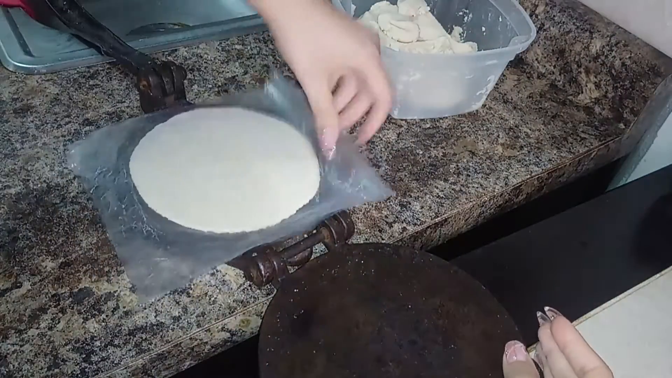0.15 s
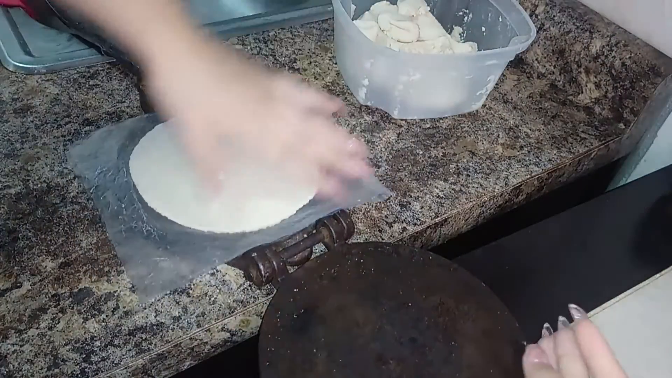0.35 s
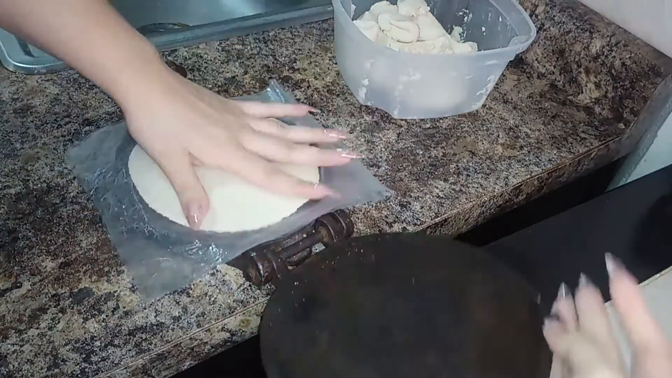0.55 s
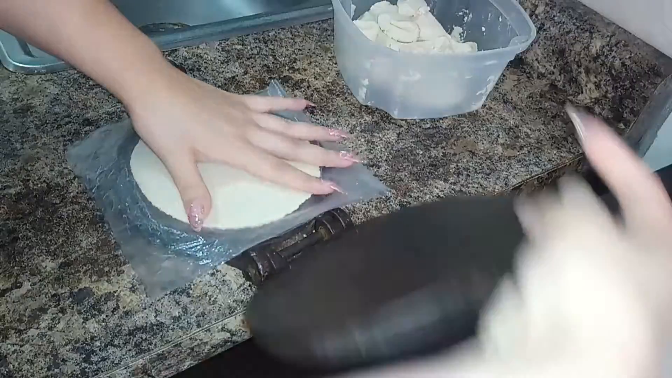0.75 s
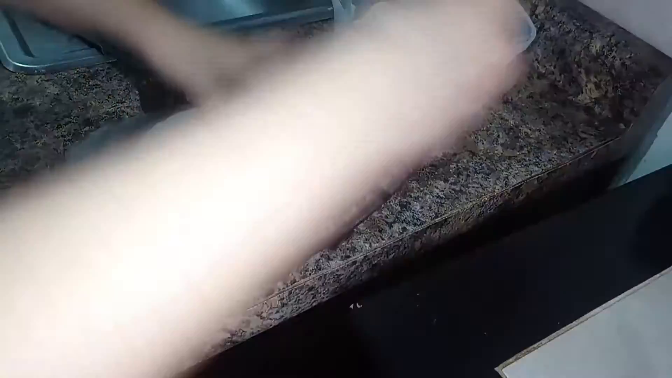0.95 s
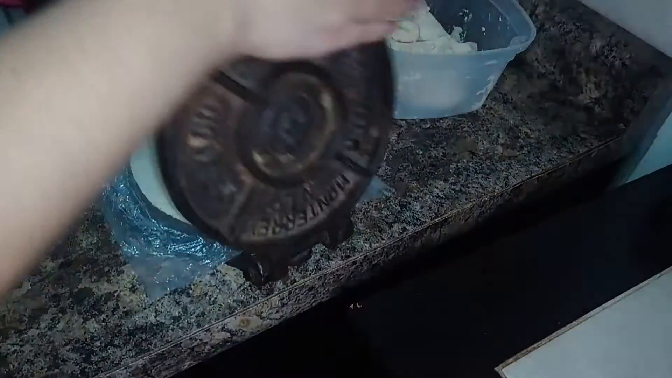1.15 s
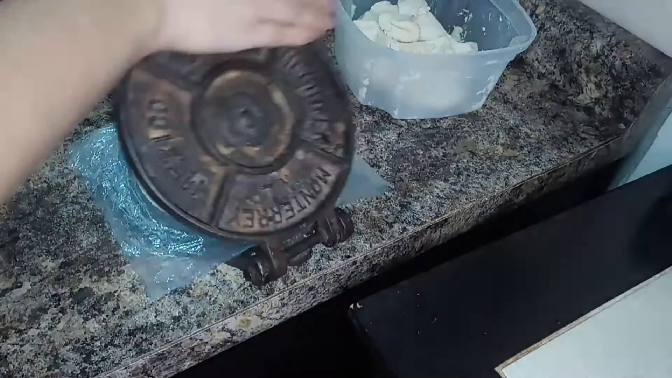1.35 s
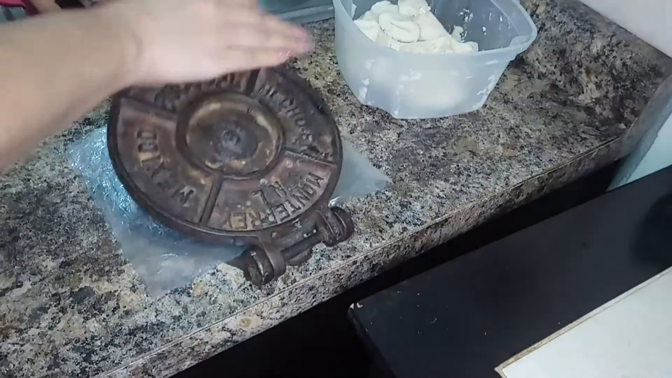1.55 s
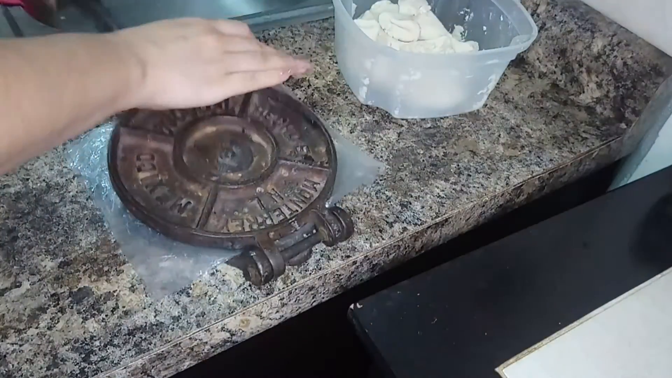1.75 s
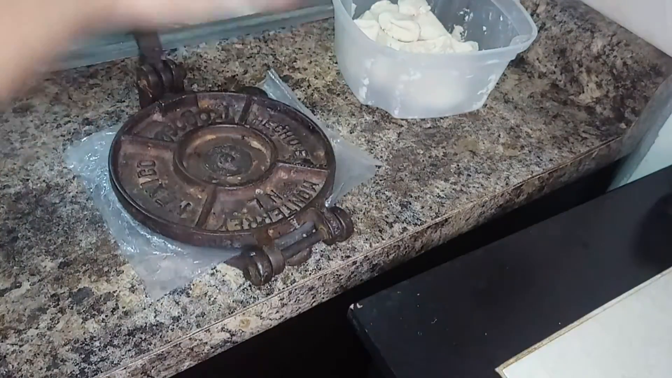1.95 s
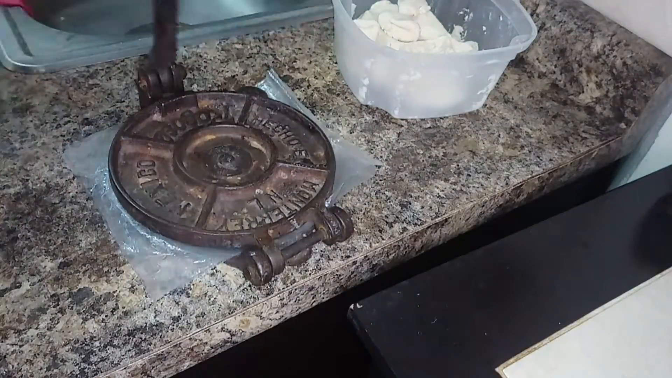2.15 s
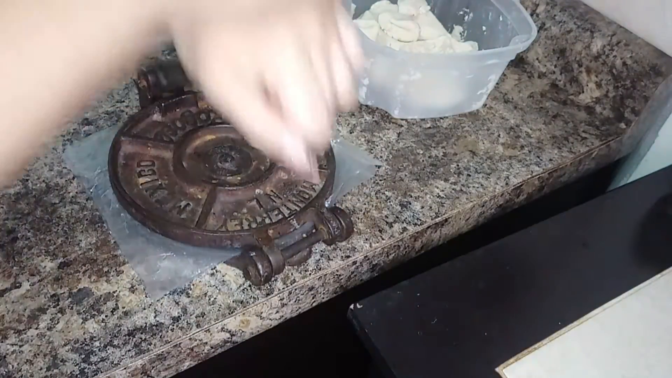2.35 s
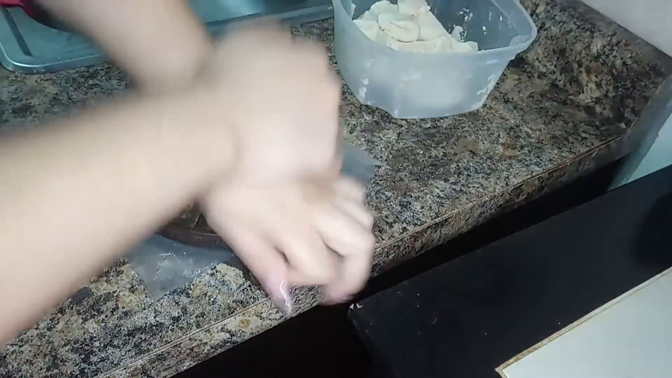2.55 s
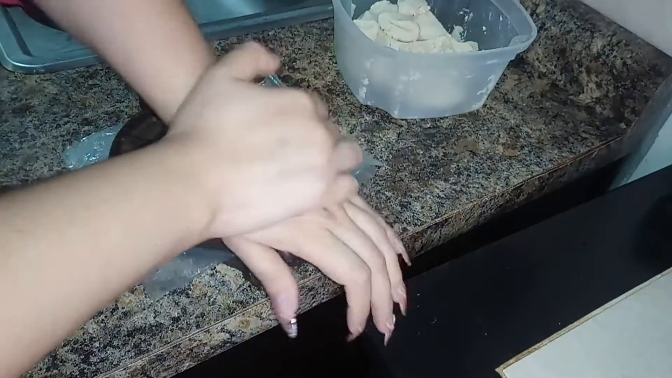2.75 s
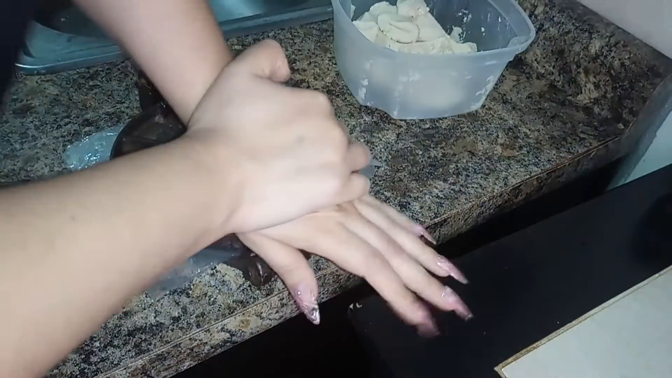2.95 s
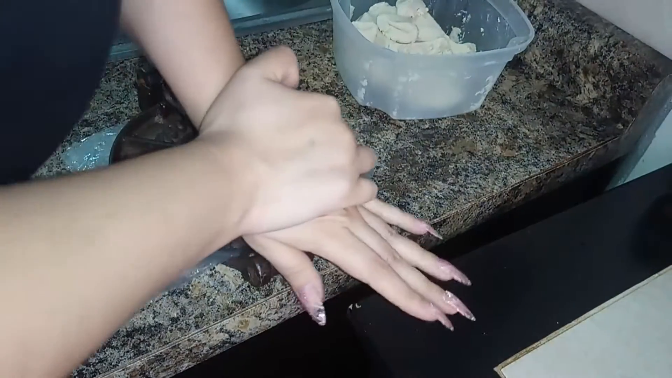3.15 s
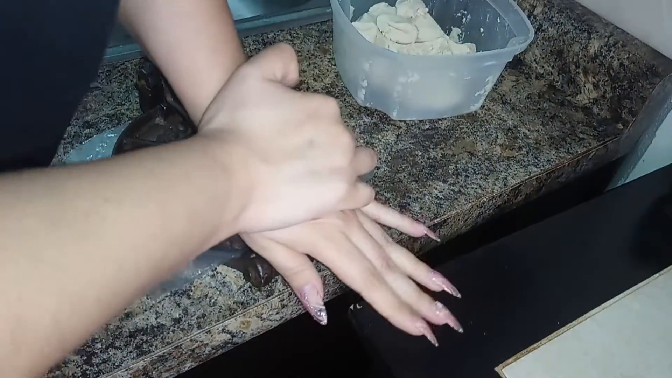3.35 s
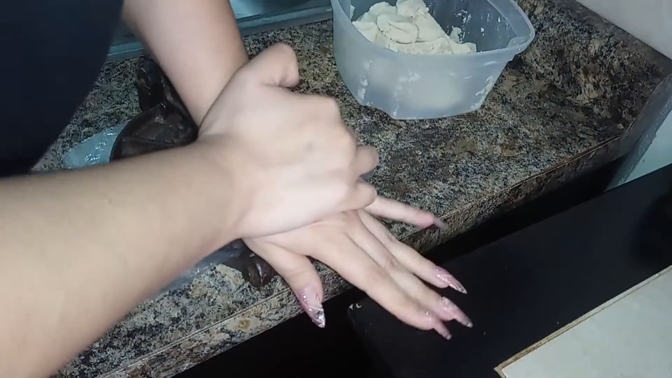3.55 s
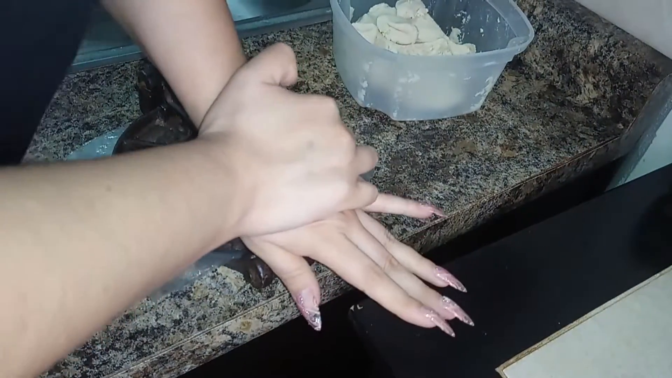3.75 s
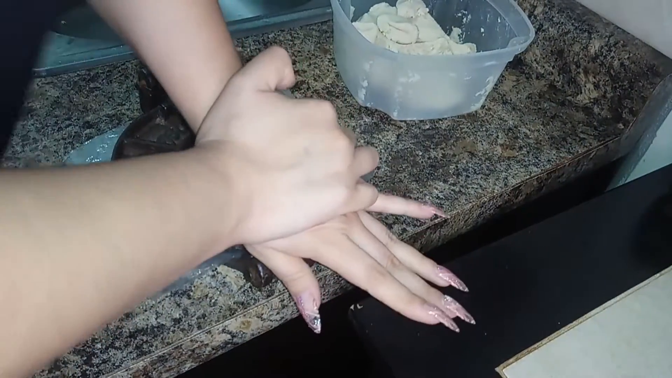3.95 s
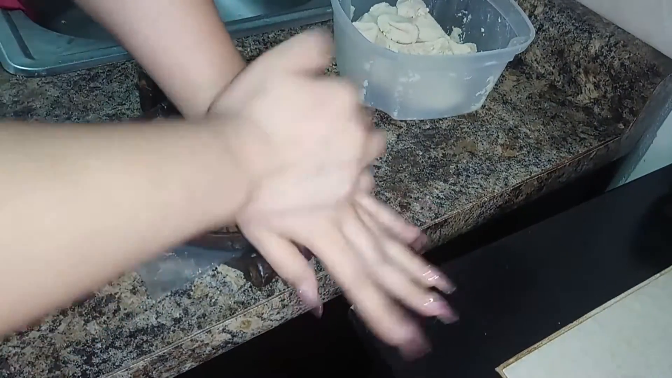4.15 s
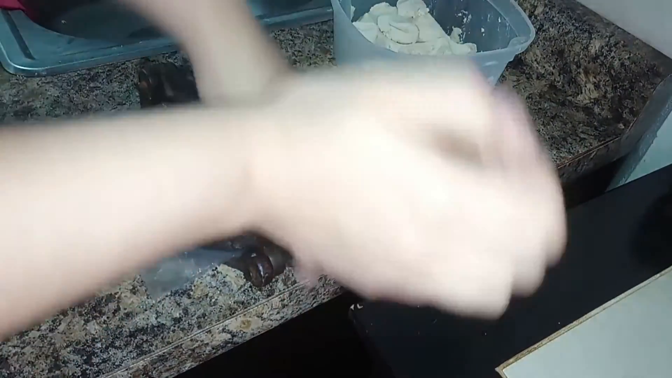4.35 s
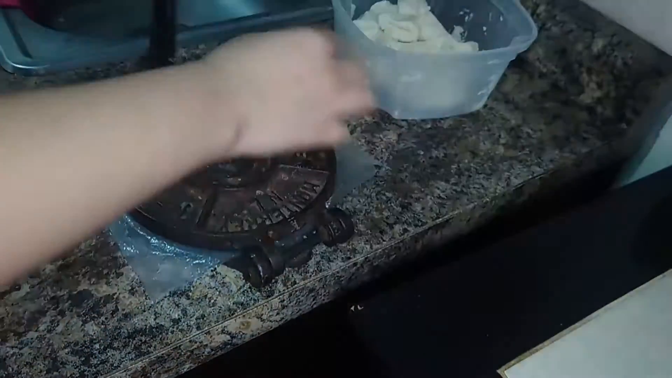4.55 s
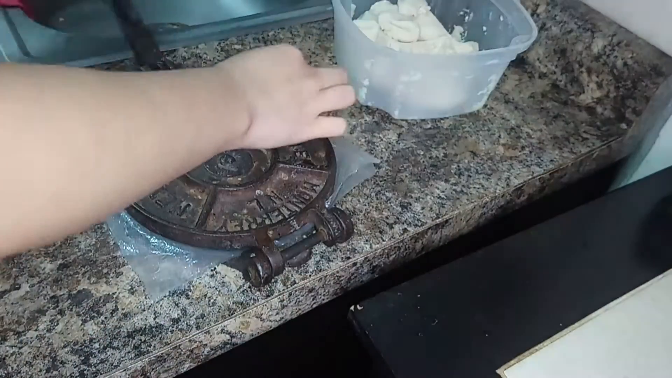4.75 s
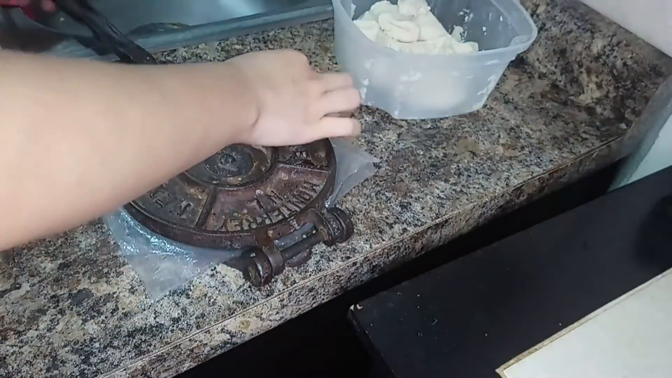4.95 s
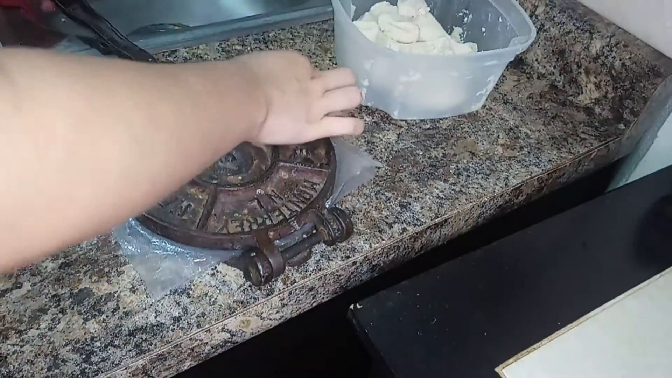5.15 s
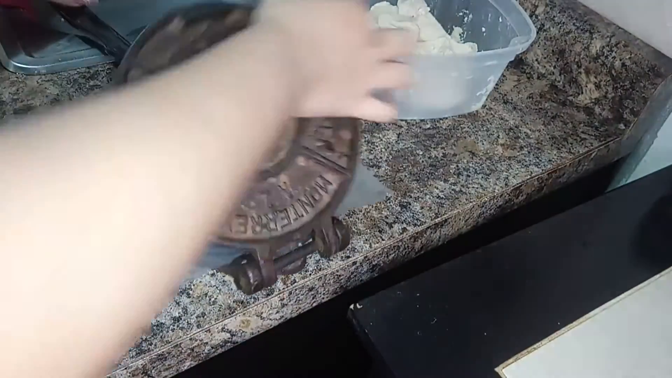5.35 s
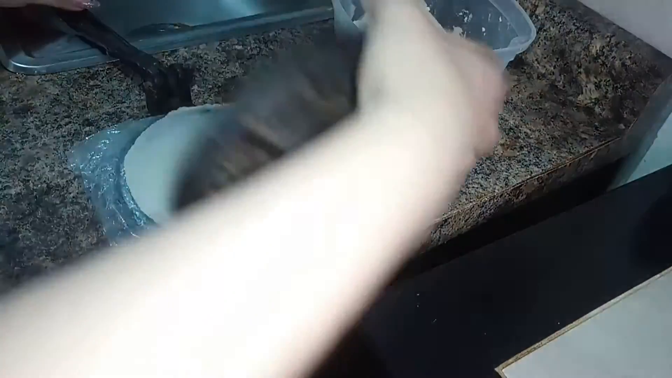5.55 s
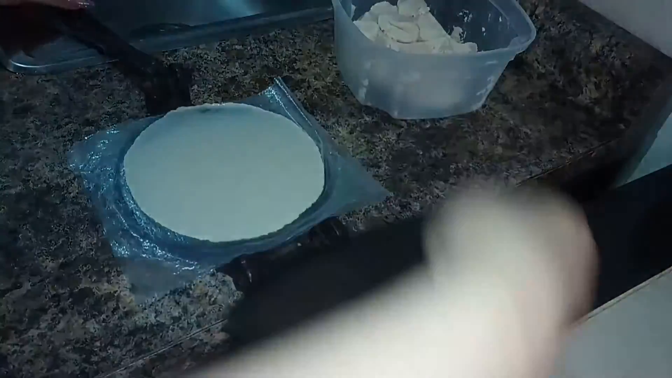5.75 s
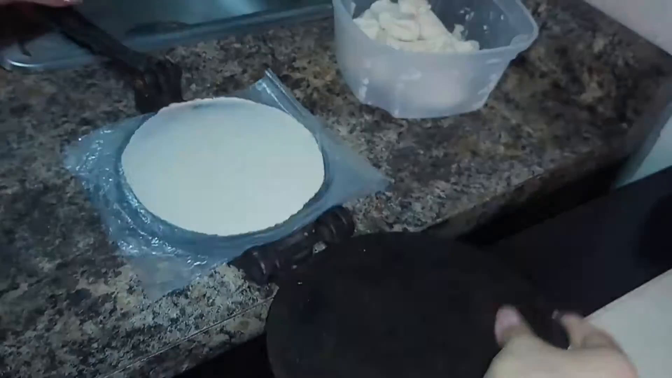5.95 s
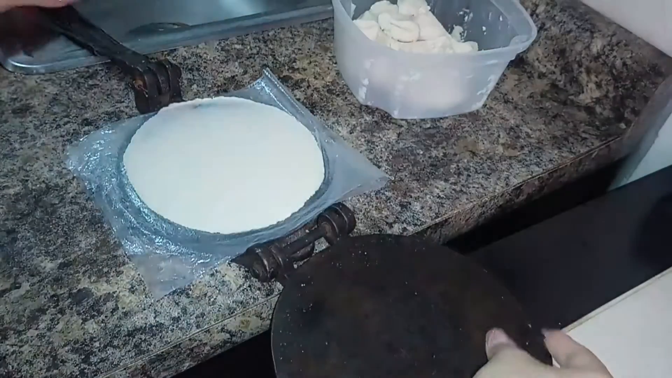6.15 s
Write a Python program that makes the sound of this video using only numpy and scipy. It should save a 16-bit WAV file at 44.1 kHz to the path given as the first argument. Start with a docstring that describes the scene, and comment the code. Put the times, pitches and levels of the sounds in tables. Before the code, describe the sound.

A heavy iron dough press is worked on a stone counter, close to the microphone and a little to the right. After a few crinkles of plastic film come uneven, briefly ringing clanks with dull, booming thuds. They pause while the film crackles softly, then resume with a gritty scrape of iron in the hinge and over stone. A fridge hums throughout, and the small kitchen adds a short echo.

```python
"""A cast-iron dough press is worked on a stone counter, an arm's length to the right of a phone.
A fridge drones throughout; first, plastic film ticks and rustles in the small, hard kitchen.
From 0.5 to 2.5 s iron clanks ring the plates while thuds knock the slab and shake the cabinet.
A lull follows, with only the film being handled. From 4.2 s the blows return, the rough iron
grinds in the hinge and over the stone, and the last clank lands at 6.1 s."""
import sys
import numpy as np
from scipy import signal
from scipy.fft import rfft, irfft
from scipy.io import wavfile
from scipy.ndimage import uniform_filter1d

SR = 44100
rng = np.random.default_rng(int(sys.argv[2]) if len(sys.argv) > 2 else 0)


def int16_out(signal):
    """Quantize to a 16-bit WAV file."""
    q = np.round(np.clip(np.atleast_2d(signal).T, -1, 1) * 32767)
    wavfile.write(sys.argv[1], SR, q.astype(np.int16))


N = 273420
SIZE, PRE_ROLL = 16384, 256  # samples in one hit, and before its attack
HZ = np.arange(SIZE // 2 + 1) * SR / SIZE
T = np.arange(SIZE) / SR
FIRST_CONTACT = rfft(np.arange(SIZE) == PRE_ROLL)  # the clean click that opens a blow


def undb(db):
    """Decibels to gain."""
    return 10 ** (np.asarray(db) / 20)

def curve(table, hz):
    """Read breakpoints joined by straight lines on a log-frequency axis."""
    freqs, values = np.transpose(table)
    return np.interp(np.log(np.maximum(hz, 1)), np.log(freqs), values)

def equalise(x, table):
    """Shape a signal with a (frequency [Hz], gain [dB]) curve."""
    n = x.shape[-1]
    return irfft(rfft(x) * undb(curve(table, np.arange(n // 2 + 1) * SR / n)), n)

def bell(freqs, hz, lift_db, octaves):
    """Bell boost in dB: the spot struck favours one pitch."""
    return lift_db * np.exp(-(np.log2(freqs / hz) / octaves) ** 2)

def minimum_phase(db):
    """Filter spectrum with the given gains that starts at once and rings only afterwards."""
    cepstrum = irfft(np.log(undb(db)), SIZE)
    cepstrum[1:SIZE // 2] *= 2
    cepstrum[SIZE // 2 + 1:] = 0
    return np.exp(rfft(cepstrum))

def rings(modes):
    """Decaying sines, one row a mode."""
    hz, _, t60 = np.transpose(modes)[:, :, None]
    return np.sin(2 * np.pi * hz * T) * np.exp(-np.log(1000) * T / t60)

def burst(rise, t60):
    """Spectrum of a unit-energy spray of contacts that swells and dies."""
    attack = 1 - np.exp(-T / max(rise, 1e-4))
    spray = rng.standard_normal(SIZE) * attack * np.exp(-np.log(1000) * T / max(t60, .004))
    return rfft(np.roll(spray, PRE_ROLL) / np.sqrt(np.sum(spray ** 2)))

def add_hit(track, time, spectrum, db):
    """Drop one hit on its cue, levelled by its loudest 3 ms."""
    hit = irfft(spectrum, SIZE)
    peak = np.sqrt(2 * uniform_filter1d(hit ** 2, size=128).max())
    start = max(int(time * SR) - PRE_ROLL, 0)
    track[start:start + SIZE] += undb(db) * hit / peak

def envelope(time, hold, db, rise, t60):
    """Gain that swells, holds and dies away."""
    t = np.arange(N) / SR - time
    attack = np.clip(t / max(rise, 1e-3), 0, 1)
    return undb(db) * attack * np.exp(-np.log(1000) * np.maximum(t - rise - hold, 0) / t60)

def crackle(per_s, spread_db, tone, channels):
    """Random tiny clicks of uneven size, at unit rms."""
    sizes = undb(spread_db * rng.exponential(size=(channels, N))) * rng.standard_normal((channels, N))
    clicks = equalise((rng.random((channels, N)) < per_s / SR) * sizes, tone)
    return clicks / clicks.std()

def diffuse(n, correlation):
    """Stereo noise, centred in the bass and wide in the treble."""
    mid, side = rfft(rng.standard_normal((2, n)))
    alike = np.clip(curve(correlation, np.arange(n // 2 + 1) * SR / n), 0, 1)
    return irfft(np.sqrt((1 + alike) / 2) * mid + np.sqrt((1 - alike) / 2) * side * [[1], [-1]], n)


# tone of the fridge bed: (frequency [Hz], gain [dB])
DRONE_EQ = [(20, -31), (50, -5), (65, 3), (90, -9), (120, 3.5), (170, -8.5), (290, -17.5), (363, -10.5),
            (545, -26), (1130, -26), (2000, -29), (4500, -27.5), (6300, -27), (8200, -44.5), (13600, -45),
            (15400, -32.5), (15900, -62)]
# its stereo image: (frequency [Hz], left-right correlation [0-1])
DRONE_IMAGE = [(60, 0.94), (200, 0.91), (400, 0.61), (800, 0.45), (1400, 0.), (16000, 0.)]
# steady motor tones: (pitch [Hz], level [dB])
MOTOR_HUM = [(64.6, -63), (118.4, -69.5), (2853, -75.5)]

def fridge():
    """A bed of gently wavering drone and faint motor hum, leaning right."""
    drone = equalise(diffuse(N, DRONE_IMAGE), DRONE_EQ)
    steps = np.repeat(rng.standard_normal(N // 4000 + 1), 4000)
    level_db = -50 + 0.9 * uniform_filter1d(steps, size=4000)[:N]
    t = np.arange(N) / SR
    hum = sum(np.sqrt(2) * undb(db) * np.sin(2 * np.pi * hz * t) for hz, db in MOTOR_HUM)
    bed = drone / drone.mean(axis=0).std() * undb(level_db) + hum
    return bed * undb([[-1.3], [1.3]])


# tick cues: (time [s], level [dB], centre [Hz], body at 1.1 kHz [dB], air at 12 kHz [dB], t60 [s])
FILM_TICKS = [(0.0094, -31.5, 5900, 4, -12, 0.0037), (0.0373, -44, 5270, -16, -14, 0.017),
              (0.1775, -47, 3880, -8, -35, 0.019), (0.373, -13.5, 5730, -13, -9.5, 0.013),
              (0.461, -37.5, 2970, -15, -14, 0.029), (1.539, -26, 3360, -14, -3, 0.042),
              (1.6163, -36.5, 3540, -10, -32, 0.035), (1.7307, -30, 3580, -18, -10, 0.042),
              (2.762, -21.5, 3800, 2.5, -21, 0.032), (4.786, -39, 5950, -13, -16, 0.026)]

def film_ticks():
    """Lone, sharp snaps of plastic film and fingernails."""
    track = np.zeros(N + SIZE)
    for time, db, hz, body_db, air_db, t60 in FILM_TICKS:
        tone = [(500, -30), (1100, body_db), (1900, -10), (hz, 0), (12000, air_db)]
        add_hit(track, time, burst(rise=1e-4, t60=t60) * minimum_phase(curve(tone, HZ)), db)
    return track[:N]


# hands on the film: (time [s], hold [s], level [dB])
FILM_RUSTLES = [(0.01, 0.064, -44.5), (0.078, 0.039, -43), (0.343, 0.058, -44.5), (1.482, .02, -47),
                (1.535, 0.12, -45.5), (1.738, 0.073, -34), (2.792, 0.037, -45.5), (2.903, 0.16, -54),
                (3.194, 0.17, -59), (3.64, .03, -62), (3.943, 0.44, -55), (4.793, 0.18, -53),
                (4.99, 0.092, -49.5)]

def film_rustle():
    """Crumpling film: tiny creases merge into a wide, dense crackle."""
    tone = [(600, -3), (1500, -4.5), (4500, -2.0), (7000, 0.5), (16000, -29.0)]
    creases = crackle(per_s=5000, spread_db=2.97, tone=tone, channels=2)
    return creases * sum(envelope(*cue, rise=0.004, t60=0.41) for cue in FILM_RUSTLES)


# reverb decay: (frequency [Hz], t60 [s])
ROOM_DECAY = [(60, 1), (160, 0.65), (420, 0.61), (1100, 0.45), (2900, 0.56), (7700, 0.62), (16000, 0.073)]
# wet against dry: (frequency [Hz], level [dB])
ROOM_WET = [(60, -4), (300, -2.5), (1000, -7), (3000, -7.5), (7000, -13), (15000, -3)]
# stereo image of the tail: (frequency [Hz], left-right correlation [0-1])
ROOM_IMAGE = [(60, 1), (200, 0.98), (400, 0.88), (800, 0.17), (1400, 0), (16000, 0.067)]

def kitchen(direct):
    """Hard walls answer from the first tick on, with a noise tail that fades band by band."""
    t = np.arange(2 * SIZE) / SR
    freqs = np.arange(1, SIZE + 2) * SR / (2 * SIZE)
    noise, tail = rfft(diffuse(2 * SIZE, ROOM_IMAGE)), 0
    for hz in 50 * 2 ** np.arange(0, 8.6, .5):  # half-octave steps
        band = irfft(noise * np.cos(np.pi * np.clip(np.log2(freqs / hz), -.5, .5)), 2 * SIZE)
        fade = (1 - np.exp(-t / 0.002)) * np.exp(-np.log(1000) * t / curve(ROOM_DECAY, hz))
        tail = tail + band * fade / np.sqrt(np.sum(fade ** 2)) * undb(curve(ROOM_WET, hz))
    return signal.fftconvolve(direct[None], tail, axes=1)[:, :N]


# low-end shudders: (time [s], hold [s], level [dB], pitch [Hz])
CABINET_SHAKES = [(0.474, .08, -52, 95), (0.849, 0.17, -30, 95.8), (1.187, .29, -29, 80),
                  (1.769, 0.14, -25.5, 83.6), (1.773, .24, -24, 50.3), (1.967, 0.032, -33, 90),
                  (2.257, 0.02, -35.5, 93.6), (2.5, 0.042, -33, 86.3), (2.506, .15, -39, 62.6),
                  (4.162, .04, -33, 75), (4.288, 0.32, -40, 96), (4.504, 0.11, -30, 89.9),
                  (4.704, .05, -32, 70.7), (5.17, 0.029, -70, 102), (5.28, 0.082, -30, 91),
                  (5.46, 0.076, -39.5, 80), (5.653, 0.23, -30.5, 98), (5.95, .05, -40, 96.8),
                  (6.12, 0.14, -32, 90)]

def cabinet():
    """The cabinet shakes on under the heavier blows: low tones that wobble in level and phase."""
    drift = signal.sosfilt(signal.butter(2, 12., fs=SR, output="sos"), rng.standard_normal((2, N)))
    wobble = (drift[0] + 1j * drift[1]) / drift.std() + 1.75
    t = np.arange(N) / SR
    swing = sum(envelope(time, hold, db, rise=0.01, t60=0.29) * np.exp(2j * np.pi * hz * t)
                for time, hold, db, hz in CABINET_SHAKES)
    return np.real(swing * wobble) * np.sqrt(2 / np.mean(np.abs(wobble) ** 2))


# resonances of plates and lever: (pitch [Hz], level [dB], t60 [s])
IRON_MODES = [(1545, -12, .15), (1710, -6, .25), (2200, -5, .12), (2520, -10, .1), (2880, -8, .3),
              (2965, -3, .3), (3390, -6, .12), (3720, -8, .12), (3845, -4, .2), (4700, -4, .2),
              (4990, -7, .15), (5310, -7, .15), (6010, -8, .15), (6170, -8, .2), (6460, -7, .2),
              (6730, -9, .15), (7380, -6, .15), (7520, -2, .15), (8560, 0, .15), (8910, 2, .12),
              (9440, 0, .12), (10600, 4, .15), (11120, 4, .15), (13380, 4, .15), (15200, 6, .1)]
# iron hits, their EQ set against 3.7 kHz: (time [s], level [dB], low mode [Hz], high mode [Hz],
# body at 1.8 kHz [dB], edge at 6.3 kHz [dB], air at 12 kHz [dB], chatter t60 [s], ring drive [dB])
IRON_CLANKS = [(0.488, -5, 2940, 3550, 8, 3, -17, 0.0093, -57),
               (0.5814, -12.5, 3000, 5830, 3, -4, -20, 0.028, -55),
               (0.828, -16, 2895, 5700, 12, -4, -25, 0.068, -58),
               (0.981, -22.5, 1690, 6010, 9.5, -7, -59, 0.057, -52),
               (1.1716, -22, 2840, 6010, 17, 1, -47, 0.016, -43),
               (1.2245, -17, 3700, 7500, 17.5, -4.5, -45, 0.21, -34),
               (1.3742, -9, 3190, 5340, 13.5, -1.5, -25, 0.038, -40),
               (1.765, -9, 3540, 5700, -2, -7, -21.5, 0.037, -43),
               (1.799, -11.5, 4700, 5070, 7, 0.5, -49, 0.08, -46),
               (1.913, -27.5, 2965, 5310, 15, 5, -20, 0.076, -40),
               (2.0718, -8, 2340, 4940, 0.5, -2.5, -27, 0.037, -73),
               (2.228, -27.5, 5310, 6400, -20, 10, 2, 0.03, -42),
               (2.259, -21, 3845, 5310, -6, -4, -40, 0.02, -32),
               (2.397, -28, 3845, 6010, 25, -20, -28, 0.0094, -58),
               (2.446, -9, 3100, 2180, 7, 1.5, -52, 0.036, -48),
               (2.4724, -12, 3280, 5310, 8.5, -1.5, -47, 0.06, -65),
               (2.5089, -22, 3200, 4880, -12, 1.5, -29, 0.055, -71),
               (4.182, -24, 1590, 5030, 4, -4, -50, 0.016, -63),
               (4.2737, -21.5, 2210, 4700, 40, 16, -27, 0.041, -61),
               (4.2966, -4.5, 4990, 6530, 1, 10, -13, 0.029, -56),
               (4.5064, -21.5, 2150, 6660, 9.5, 0, -35, 0.17, -37),
               (4.5358, -7.5, 6730, 15200, -13, 3.5, -14.5, 0.016, -48.5),
               (4.6365, -22, 2210, 6900, 13, 0, -36, 0.015, -58),
               (5, -29.5, 1520, 6010, 28, -9, -23, 0.024, -56),
               (5.105, -14, 3020, 6010, 1.5, -3.5, -21, 0.054, -60),
               (5.126, -7, 3210, 6040, 6, -2, -54, 0.05, -58),
               (5.2765, -17.5, 2860, 6140, 3, -10, -21, 0.042, -62),
               (5.32, -7.5, 3510, 4750, 15, 3.5, -13, 0.015, -57),
               (5.3614, -15.5, 2890, 5800, -3, -4, -24, 0.11, -65),
               (5.464, -8.5, 3560, 5660, 10.5, 1, -26, 0.025, -74),
               (5.594, -20.5, 3390, 6010, 7, -6, -48, 0.011, -28.5),
               (5.6202, -15, 3380, 6000, 2.5, -3, -34, 0.026, -55),
               (5.7362, -11, 3010, 4700, 2, 0, -22, 0.013, -53),
               (5.7562, -6, 3050, 4650, 5, 10, -14.5, 0.041, -53),
               (5.953, -28.5, 1640, 6460, 15, 1, -45, 0.15, -44),
               (6.048, -5.5, 3202, 6010, 9, 5.5, -20, 0.018, -57),
               (6.123, -15, 3500, 6170, 3.5, -0.5, -27, 0.039, -43)]

def clanks():
    """Iron on iron: a chatter of hard contacts rings the plates, with two modes struck extra hard."""
    track, modes = np.zeros(N + SIZE), rings(IRON_MODES)
    mode_hz, mode_db, _ = np.transpose(IRON_MODES)
    clink = undb(-41 - 60 * T / 0.052)  # brief ring while the faces still touch
    for time, db, low_hz, high_hz, body_db, edge_db, air_db, t60, ring_db in IRON_CLANKS:
        tone = [(500, body_db - 5), (1200, body_db - 0.5), (1800, body_db),
                (3700, 0.0025), (6300, edge_db), (12000, air_db)]
        struck_hz = [mode_hz[np.abs(mode_hz - hz).argmin()] for hz in (low_hz, high_hz)]
        drive_db = mode_db + curve(tone, mode_hz) + 10 * np.isin(mode_hz, struck_hz)
        drive_db += 2 * rng.standard_normal(len(mode_hz))
        damped = undb(ring_db - 60 * T / 0.15)  # hands and dough choke the iron
        ring = rfft((undb(drive_db) @ modes) * (damped + clink))
        chatter = burst(rise=0.0012, t60=t60)
        bite_db = bell(HZ + 1, low_hz, 6., .15) + bell(HZ + 1, high_hz, 5., .1)
        attack = chatter * minimum_phase(curve(tone, HZ) + bite_db)
        add_hit(track, time, attack + (FIRST_CONTACT + chatter / 4) * ring, db)
    return track[:N]


# resonances of cabinet (lowest four) and slab: (pitch [Hz], level [dB], t60 [s])
COUNTER_MODES = [(132, -2, 0.23), (163.5, 2.5, 0.19), (203, -12, 0.028), (228.6, 7, 0.053),
                 (317, -7, 0.071), (388, -29.5, 0.17), (395.8, 0.5, 0.15), (473.6, -3, 0.059),
                 (547, -15, 0.099), (586, -1, 0.032), (636, 9, 0.011), (708, 12, 0.0099), (863, 9, 0.016),
                 (942, -9.5, 0.22), (1140, 8, 0.03)]
# weight landing: (time [s], level [dB], knock [Hz], boom against knock [dB], boom [Hz], rumble t60 [s])
COUNTER_THUDS = [(0.4903, -8.5, 565, -11.5, 132, 0.015), (0.58, -13, 396, -12, 144, 0.11),
                 (0.831, -8.5, 687, -14, 245, 0.068), (0.859, -25.5, 556, -6.5, 132, 0.034),
                 (0.979, -14.5, 296, -10, 250, 0.024), (1.03, -20.5, 290, -2, 124, 0.14),
                 (1.168, -16, 273, -7.5, 138, 0.2), (1.227, -11.5, 585, -5, 137, 0.099),
                 (1.243, -9.5, 718, -16, 137, 0.039), (1.275, -18, 407, -1, 135, 0.017),
                 (1.369, -7, 370, -14, 189, 0.059), (1.409, -17.5, 570, -20.5, 193, 0.098),
                 (1.572, -25, 696, -32, 126, 0.38), (1.773, -4, 294, -7.5, 140, 0.18),
                 (1.799, -12.5, 255, -16, 241, 0.075), (1.869, -33, 350, 14.5, 119, 0.043),
                 (1.916, -25.5, 363, -12, 127, 0.078), (2.068, -12.5, 352, -6, 131, 0.11),
                 (2.257, -23.5, 660, -2.5, 129, 0.17), (2.393, -26.5, 610, -9, 147, 0.17),
                 (2.445, -17.5, 826, -40, 238, 0.092), (2.472, -24.5, 590, -4.5, 135, 0.096),
                 (2.509, -9.5, 717, -10, 131, 0.021), (4.182, -27, 380, -19.5, 125, 0.065),
                 (4.275, -8.5, 723, -16.5, 132, 0.026), (4.39, -25, 310, -1.5, 160, 0.28),
                 (4.507, -12.5, 306, -11.5, 118, 0.17), (4.538, -19.5, 393, 7, 117, 0.085),
                 (4.636, -10, 694, -12.5, 137, 0.028), (4.677, -20, 306, -8, 125, 0.3),
                 (5, -30.5, 842, -2.5, 133, 0.031), (5.084, -28.5, 730, -45, 175, 0.045),
                 (5.106, -28, 696, 18, 233, 0.22), (5.133, -6, 385, -17, 125, 0.044),
                 (5.276, -11, 358, -5.5, 125, 0.12), (5.32, -17, 250, 12, 234, 0.11),
                 (5.374, -9.5, 382, 4, 208, 0.061), (5.486, -7, 380, -32, 228, 0.097),
                 (5.519, -7.5, 369, -53, 244, 0.15), (5.592, -11, 257, -25, 248, 0.019),
                 (5.622, -9.5, 374, -44, 159, 0.036), (5.736, -10, 350, -45, 250, 0.026),
                 (5.758, -11.5, 850, -30, 127, 0.073), (5.927, -29.5, 361, 2.5, 208, 0.048),
                 (5.956, -13.5, 427, -32, 216, 0.067), (6.051, -18, 372, -22, 132, 0.19),
                 (6.067, -10, 382, -19.5, 132, 0.022), (6.116, -17.5, 410, -5.5, 234, 0.017)]

def thuds():
    """Blunt, uneven pushes knock the stone slab and set the cabinet booming."""
    track, modes = np.zeros(N + SIZE), rfft(rings(COUNTER_MODES))
    mode_hz, mode_db, _ = np.transpose(COUNTER_MODES)
    soft_contact = minimum_phase(curve([(900, 0), (1080, -11), (1400, -20), (3000, -34)], HZ))
    for time, db, knock_hz, boom_db, boom_hz, t60 in COUNTER_THUDS:
        drive_db = mode_db + bell(mode_hz, knock_hz, 5.7, 0.19) + bell(mode_hz, boom_hz, 15.3, 0.21)
        drive = undb(drive_db + 2 * rng.standard_normal(len(mode_hz)))
        push = (burst(rise=0.0046, t60=t60) + 1.24 * FIRST_CONTACT) * soft_contact
        knock = minimum_phase(bell(HZ + 1, knock_hz, 46.8, 0.43))  # the dull contact itself
        slab, boom = drive[4:] @ modes[4:], drive[:4] @ modes[:4]
        add_hit(track, time, push * (slab + knock), db)
        add_hit(track, time, push * boom, db + boom_db)
    return track[:N]


# scrapes between blows: (time [s], hold [s], level [dB])
IRON_GRINDS = [(1.803, 0.044, -46), (4.656, 0.12, -44.5), (5.278, 0.023, -22.5), (5.332, 0.31, -30.5)]

def hinge():
    """Rough cast faces stick and slip in the hinge and over the stone: a dark grit."""
    tone = [(200, 9.5), (700, 6), (1300, 0.5), (3000, -7.0), (6000, -13.5), (9000, -44)]
    grit = crackle(per_s=1200, spread_db=2.55, tone=tone, channels=1)[0]
    return grit * sum(envelope(*cue, rise=0.011, t60=0.45) for cue in IRON_GRINDS)


# send to the early reflections: (frequency [Hz], gain [dB])
BOUNCE_EQ = [(300, -50), (900, -37), (2000, -31), (8000, -27)]
# shading of the far, left microphone port: (frequency [Hz], gain [dB])
LEFT_SHADE_EQ = [(60, -1.5), (250, -2.8), (1000, -1.5), (2500, -2.2), (5000, -7), (8000, -17), (15000, -16)]
# colour of both ports: (frequency [Hz], gain [dB])
PORT_EQ = [(30, -12.5), (60, -15), (110, 1.5), (5000, 0.5), (6800, -5), (8300, -16.5), (11000, -15),
           (13500, -30.5), (15200, -11), (16500, -49)]

def scene():
    """The mix: the press sits right, so the left port hears it later and duller."""
    ticks, rustle = film_ticks(), film_rustle()
    direct = clanks() + thuds() + hinge() + ticks
    left = np.roll(direct, round(0.00028 * SR))
    # quick bounces off slab, bowl and arms reach each port differently, above the bass
    scatter = rng.standard_normal((2, 3000)) * np.exp(-np.arange(3000) / SR / .012)
    bounces = signal.fftconvolve(equalise(direct, BOUNCE_EQ)[None], scatter, axes=1)[:, :N]
    mix = np.array([left, direct]) + bounces + kitchen(direct) + rustle + cabinet()
    mix[0] = equalise(mix[0], LEFT_SHADE_EQ)
    return equalise(mix, PORT_EQ) * undb(-1.0) + fridge()

def record(dry):
    """The phone soft-clips the loudest peaks and cuts the top above 16.5 kHz."""
    rounded = np.tanh(0.88 * dry) / 0.68
    return signal.sosfilt(signal.ellip(10, .2, 90, 16500, fs=SR, output="sos"), rounded)


dry = scene()
out = record(dry)
int16_out(out)
```